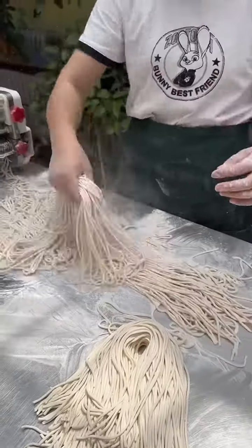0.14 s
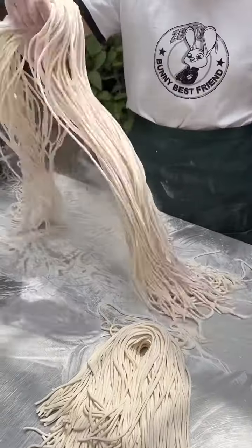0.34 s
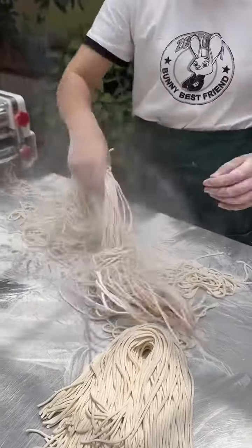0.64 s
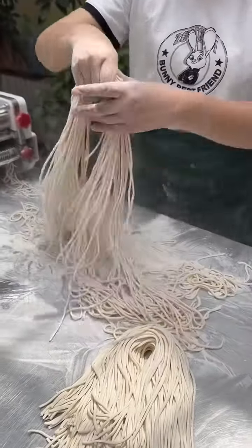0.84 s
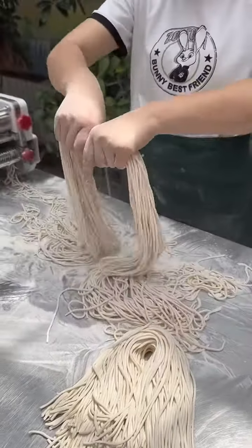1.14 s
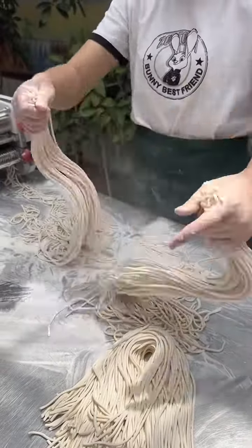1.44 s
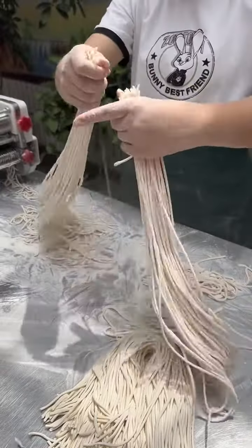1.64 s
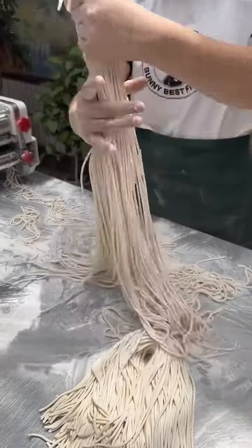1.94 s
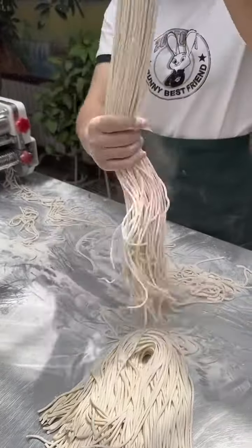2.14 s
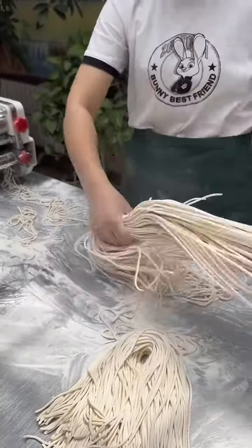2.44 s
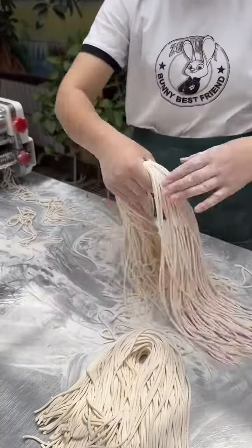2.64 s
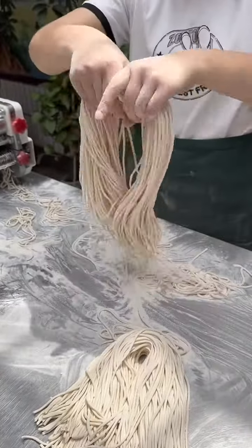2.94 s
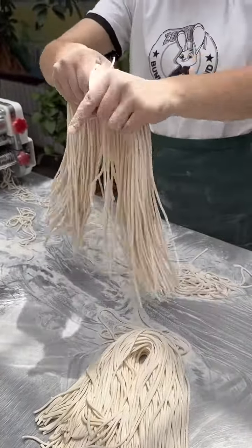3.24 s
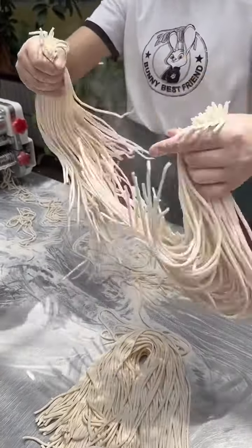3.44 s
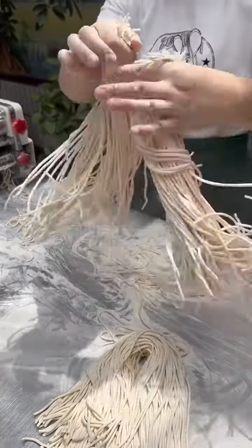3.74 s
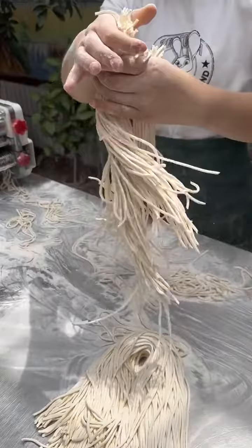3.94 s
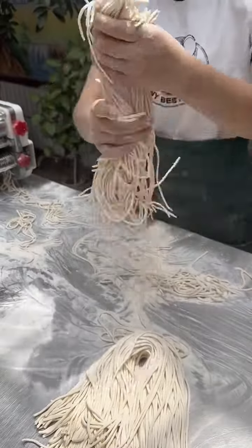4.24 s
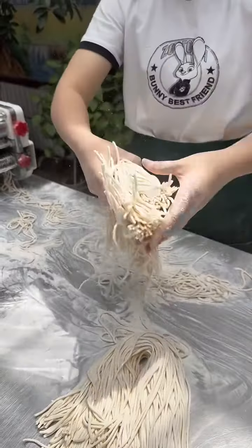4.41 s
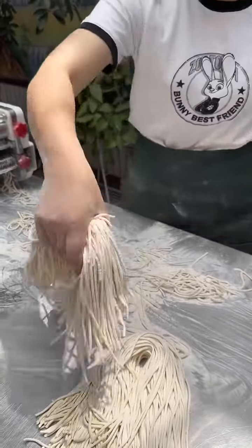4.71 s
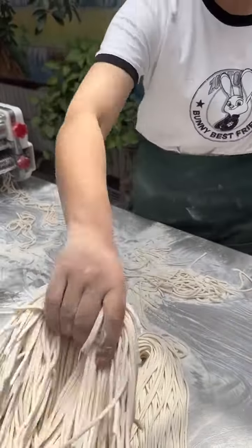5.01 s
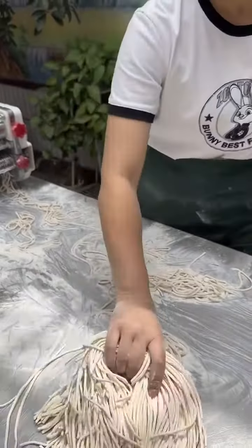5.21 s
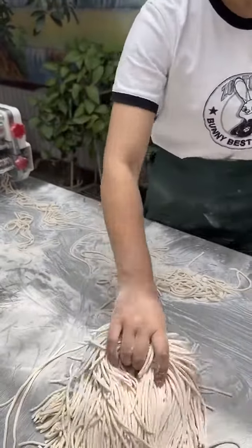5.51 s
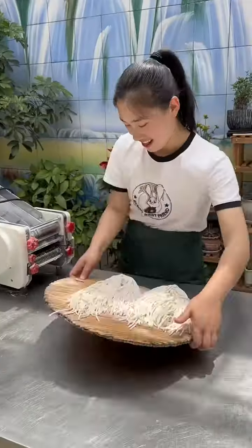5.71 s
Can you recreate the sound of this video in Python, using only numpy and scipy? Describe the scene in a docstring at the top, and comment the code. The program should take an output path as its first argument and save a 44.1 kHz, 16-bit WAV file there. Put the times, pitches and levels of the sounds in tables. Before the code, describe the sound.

In a small, lightly ringing kitchen, noodles land with dense, grainy patter on metal. A double slap starts things, low buffets and a close knock follow, then the brightest slap, fine rustles, and the heaviest deep thump clipping the microphone. After a quiet gap a soft bundle drops nearby and a woven tray scrapes. Sound is centred, practically mono, with little treble.

```python
"""In a kitchen, bundles of fresh floured noodles are swung, slapped and dropped on a steel worktop.
Each landing is a dense patter of tiny random contacts with a hollow note of trapped air.
Strands swish and tick in finer grains; swung and landing bundles push air at the microphone,
heard as dull thumps of damped tones and as low noise. A woven tray scrapes at the end,
over soft room noise and a faint hum."""
import sys
import numpy as np
from scipy import signal
from scipy.fft import rfft, irfft
from scipy.io import wavfile

SR = 44100
rng = np.random.default_rng(int(sys.argv[2]) if len(sys.argv) > 2 else 0)


def materialize(psi):
    """Save the field psi as 16-bit PCM at rate SR to the path in sys.argv[1].

    A 1-D psi becomes a single channel; in a 2-D psi each row is a channel.
    """
    bounded = np.clip(np.atleast_2d(psi).T, -1, 1)
    quanta = np.round(bounded * 32767).astype(np.int16)
    wavfile.write(sys.argv[1], SR, quanta)


N = 258822
TIME = np.arange(N) / SR  # seconds
FREQ = np.maximum(np.fft.rfftfreq(4096, 1 / SR), 1)  # Hz, kept above zero for the logarithms

# Bundles landing on the steel: tips_peak_s, tips_level_db, tips_spread_s, bulk_lag_s, bulk_level_db,
# settling_level_db, settling_decay_s, hardness_0_to_1, hollow_pitch_hz, hollow_boost_db
LANDINGS = [ (0.057, -19.5, 0.0063, 0.0033, -24.5, -26.5, 0.039, 0.41, 1064, 2.5),
            (0.542, -16, 0.0032, .012, -14.5, -24.5, .04, 0.53, 1110, 6),
            (0.6562, -17, 0.0016, 0.011, -27.5, -31, 0.03, 0.49, 835, 2.5),
            (2.452, -30.5, .004, 0.023, -23, -40, .02, 0.02, 980, 23.5),
            (2.4962, -8, 0.0016, .017, -9.5, -24.5, .045, 0.8, 971, -2.5),
            (4.4435, -30, 0.0035, 0.022, -35.5, -38.5, 0.062, 0.09, 985, 5),
            (5.1745, -29, 0.0033, 0.019, -18.5, -39.5, 0.028, 0.33, 895, 16)]
# Colour of a slap: frequency_hz, level_db
SLAP_COLOUR = [(40, -2), (130, -4), (300, -2), (650, -0.5), (1000, 2.5), (1350, -2.5), (1850, -10.5),
               (2800, -7.5), (4000, -16.5), (5500, -19), (7500, -34), (10000, -43), (13000, -68)]
# Less room is heard as the last bundle lands nearer the microphone: time_s, room_send_db
SLAP_ROOM = [(4.4, -2.5), (5.15, -7)]
# Strands sliding through the hands and over the flour; the two long, faint rows at 0.42 and 1.17 s
# are swells of background hiss: peak_s, level_db, rise_s, rustle_centre_hz, hollow_boost_db
SWISHES = [ (0.420, -60, .10, 2790, -4), (1.170, -62, 0.17, 2850, 1), (1.262, -51, 0.0087, 6400, 13),
           (1.650, -55.5, 0.024, 2620, -13), (1.715, -50, 0.031, 2440, -10.5),
           (1.977, -43.5, .036, 2750, 15.5), (2.063, -48.5, .058, 3800, -1), (2.230, -61, .033, 3500, -0.5),
           (2.474, -30, 0.019, 2650, 3), (2.555, -40, .012, 4600, 0), (2.713, -51.5, 0.038, 3060, -1),
           (3.133, -41, .007, 2540, 17), (3.190, -49.5, .028, 3350, 18), (3.279, -37.5, 0.0098, 3500, 5.5),
           (3.505, -65, .018, 4800, -7.5), (3.590, -52.5, 0.017, 2910, -13), (4.504, -47, .036, 2700, 1),
           (5.083, -61, 0.028, 2800, 14.5), (5.226, -43, .014, 2800, 6), (5.285, -50.5, 0.056, 2650, -10)]
# Colour of sliding strands: frequency_hz, level_db
SWISH_COLOUR = [(100, -15), (600, -2), (1200, 1), (1750, -11), (2450, -3.5), (3400, -4.5), (4800, -9),
                (6500, -20.5), (8500, -37), (12000, -67)]
# A faster slide rustles higher and brighter: rustle_centre_hz, brightness_db_per_octave
SLIDE_BRIGHTNESS = [(2500, -10), (3300, 4), (6400, 5.5)]
# Single strands snapping or flicking the steel: peak_s, level_db, pitch_hz
TICKS = [(1.289, -28, 3570), (1.661, -40.5, 2630), (2.2, -44, 3466), (5.299, -30.5, 3700)]
# Dull thumps of air pushed at the microphone by swinging and landing bundles:
# peak_s, level_db, pitch_hz, rise_s, decay_s
THUMPS = [ (0.062, -28.5, 60, 0.0043, 0.0089), (0.55, -17.5, 49.6, 0.011, 0.003),
          (0.798, -12, 93.5, 0.0027, 0.0052), (0.902, -21.5, 59.5, 0.0087, 0.018),
          (1.328, -15.5, 36, 0.018, 0.078), (1.368, -16, 83, .0044, 0.018), (1.834, -18, 78, 0.0019, 0.016),
          (2.22, -26.5, 56.5, 0.0096, 0.0033), (2.351, -24.5, 69, 0.005, 0.0099),
          (2.512, -20, 136, .009, .02), (2.915, -36.5, 85.8, 0.0034, 0.0066),
          (3.331, 2.5, 46.2, 0.009, 0.015)]
# Dry knocks close to the microphone: peak_s, level_db, rise_s, decay_s, brightness_db_per_octave
KNOCKS = [(1.338, -29.5, .003, 0.035, 2.5), (1.365, -16.5, 0.0016, 0.0025, 0.5),
          (1.3735, -7, 0.00082, 0.001, -3), (3.314, -10.5, 0.0014, 0.0043, 2),
          (3.338, -14, 0.003, 0.003, 1.5), (3.35, -19.5, 0.0059, 0.016, -1.5)]
# Colour of a knock: frequency_hz, level_db
KNOCK_COLOUR = [(40, 5), (130, -1), (420, -7), (750, -15), (1300, -20), (2000, -26), (4000, -35.5),
                (7000, -46), (8500, -58), (10500, -80.5)]
# Swings of the bundle pushing air at the microphone: peak_s, level_db, rise_s
SWINGS = [ (0.135, -31, .03), (0.836, -25, 0.047), (1.368, -24, 0.054), (2.02, -36.5, 0.078),
          (2.395, -28.5, .028), (2.78, -42.5, 0.06), (3.173, -35, .018), (3.341, -21, 0.028),
          (4.421, -46, 0.039)]
# Colour of the pushed air: frequency_hz, level_db
AIR_COLOUR = [(10, -1.5), (25, 0), (60, 1.5), (130, -8), (220, -20), (400, -31.5), (1000, -86)]
# Colour of the scraping tray: frequency_hz, level_db
TRAY_COLOUR = [(50, 8), (130, 5.5), (500, 9), (1200, 5.5), (2100, 6.5), (3000, -4.5), (5000, -16.5),
               (7000, -41.5), (10000, -82)]
# Resonances of the tray: pitch_hz, width_hz, boost_db
TRAY_MODES = [(130, 105, 13), (478.4, 12, 17.5), (824, 113, 17), (1194, 190, 14), (2093, 40, 17)]
# Ringing bands of worktop and room (t60 is the time to fall by 60 dB): centre_hz, t60_s, level_db
RING_BANDS = [(207.4, 0.38, -16), (550, 0.52, -7.5), (990, 0.82, -22), (1576, 0.21, -11.5),
              (2660, 0.41, -9), (5000, 0.3, -10.5)]
# Ringing modes of the steel sheet: pitch_hz, t60_s, level_db
SHEET_MODES = [(648, .39, -40), (1224, .45, -37.5), (2190, .35, -35.5), (2353, .4, -33.5),
               (3020, .4, -34.5), (4640, .3, -31.5)]
# Level of the room's background: time_s, level_db
BACKGROUND_LEVEL = [(0, -55), (1.15, -57), (1.5, -59), (1.85, -56), (2.35, -57.5), (2.8, -62), (3.05, -76),
                    (3.35, -62.5), (3.9, -71), (4.95, -67), (5.15, -61), (5.7, -64)]
# Colour of the room noise: frequency_hz, level_db
ROOM_COLOUR = [(40, -13.5), (120, 0), (250, -8.5), (450, -6), (1000, -10.5), (1900, -13.5), (2900, -14.5),
               (3900, -19), (5300, -26), (6500, -35.5), (8000, -59), (10000, -59)]
# Mains hum of an appliance: pitch_hz, level_against_background_db
HUM = [(50, -12), (150, -15.5), (250, -7.5), (300, -12), (450, -12.5), (700, -16.5), (800, -17),
       (1000, -15.5)]

# A landing: the tips touch first, the bulk follows, then loose strands settle
TIPS_FALL_PER_RISE, TIPS_WEIGHT_DB, TIPS_DB_PER_OCTAVE = 1.2, -3, -1.04
BULK_RISE_S, BULK_DECAY_S = 0.0051, 0.008
SETTLE_LAG_S, SETTLE_RISE_S, SETTLE_WEIGHT_DB, SETTLE_DB_PER_OCTAVE = 0.02, 0.008, 6, -1.27
# From the softest landing to the hardest: brightness, top of the treble, weight below about 500 Hz
SOFT_DB_PER_OCTAVE, HARD_DB_PER_OCTAVE = -5.5, 5.5
SOFT_TOP_HZ, HARD_TOP_HZ = 3800, 7730
SOFT_WEIGHT_DB, HARD_WEIGHT_DB = -23, 11
HOLLOW_WIDTH_HZ = 240
# A slower slide also dies away more slowly
SWISH_RELEASE_S, SWISH_FALL_PER_RISE = 0.0079, 1.05
# A heavy thump gains a short overtone, growing with the square of its strength
OVERTONE_RATIO, OVERTONE_DB, OVERTONE_LENGTH = 2.6, -9, 0.57
# The eddies outlast the push, and leave a weak, slow wake
EDDY_FALL_PER_RISE, WAKE_DB, WAKE_DECAY_S, WAKE_TOP_HZ = 1.4, -23.5, 0.079, 25
TOP_HZ = 10000
OFFSET = 0.0015  # constant shift of the waveform


def undb(db):
    """Turn decibels into gain."""
    return 10 ** (np.asarray(db) / 20)


def unit(x):
    """Scale to an rms of 1."""
    return x / np.sqrt(np.mean(x ** 2))


def curve(rows):
    """Join (time, value) rows by straight lines."""
    return np.interp(TIME, *np.transpose(rows))


def shape(points):
    """Join (Hz, dB) points along a logarithmic frequency axis."""
    hz, db = np.transpose(points)
    return np.interp(np.log(FREQ), np.log(hz), db)


def octaves_above(hz, most):
    """Count octaves above a frequency, from zero up to that frequency times most."""
    return np.log2(np.clip(FREQ / hz, 1, most))


def bump(hz, width_hz):
    """Outline a resonance that is 1 at its centre."""
    return 1 / (1 + ((FREQ - hz) / (0.5 * width_hz)) ** 2)


def colour(x, colour_db):
    """Filter with the given gain at each frequency, letting nothing sound before its cause."""
    cepstrum = irfft(colour_db * np.log(10) / 20)
    half = len(cepstrum) // 2
    # Folding the second half onto the first makes the filter minimum phase
    cepstrum[1:half] *= 2
    cepstrum[half + 1:] = 0
    response = irfft(np.exp(rfft(cepstrum)))
    return signal.fftconvolve(x, response)[:len(x)]


def swell(peak_s, rise_s, decay_s):
    """Give the sample range and envelope of a soft rise and an exponential fall."""
    first = max(0, int((peak_s - 4 * rise_s) * SR))
    last = int((peak_s + 9 * decay_s + 0.02) * SR)
    span = slice(first, last)
    t = TIME[span] - peak_s
    return span, np.exp(np.where(t < 0, -0.5 * (t / rise_s) ** 2, -t / decay_s))


def contacts(rate, spread_db):
    """Scatter tiny random contacts of uneven size, rate of them a second."""
    chance, size = rng.random(N), rng.standard_normal(N)
    hit = np.flatnonzero(chance < rate / SR)
    clicks = np.zeros(N)
    # The neighbouring draw sets the sign, so it does not depend on the size
    clicks[hit] = np.sign(size[hit - 1]) * undb(spread_db * size[hit])
    return clicks


def add(out, peak_s, level_db, rise_s, decay_s, clicks, colour_db):
    """Add one coloured flurry of contacts whose rms peaks near level_db."""
    span, envelope = swell(peak_s, rise_s, decay_s)
    flurry = clicks[span] * envelope
    flurry = flurry * np.linalg.norm(envelope) / (np.linalg.norm(flurry) + 1e-18)
    colour_gain = np.sqrt(np.mean(undb(colour_db) ** 2))
    out[span] += undb(level_db) * colour(flurry, colour_db) / colour_gain


def hollow(hz, width_hz, third=0.35):
    """A pocket of air open at one end rings at its note and, more weakly, at three times that."""
    return bump(hz, width_hz) + third * bump(3 * hz, 2 * width_hz)


def slaps():
    """Tips, bulk, then stragglers patter down; harder is brighter and heavier, and trapped air sounds hollow."""
    out = np.zeros(N)
    treble = octaves_above(1000, most=6)
    bass = 1 / (1 + (FREQ / 520) ** 4)
    for (tips_s, tips_db, spread_s, lag_s, bulk_db, settle_db, settle_decay_s,
         hardness, hollow_hz, hollow_db) in LANDINGS:
        db_per_octave = SOFT_DB_PER_OCTAVE + hardness * (HARD_DB_PER_OCTAVE - SOFT_DB_PER_OCTAVE)
        top_hz = SOFT_TOP_HZ + hardness * (HARD_TOP_HZ - SOFT_TOP_HZ)
        weight_db = SOFT_WEIGHT_DB + hardness * (HARD_WEIGHT_DB - SOFT_WEIGHT_DB)
        tone = shape(SLAP_COLOUR) + db_per_octave * treble + weight_db * bass
        tone = tone - 10 * np.log10(1 + (FREQ / top_hz) ** 12)  # steep fall above the top
        tone = tone + hollow_db * hollow(hollow_hz, HOLLOW_WIDTH_HZ)
        tips_tone = tone + TIPS_WEIGHT_DB * bass + TIPS_DB_PER_OCTAVE * treble
        settle_tone = tone + SETTLE_WEIGHT_DB * bass + SETTLE_DB_PER_OCTAVE * treble
        bulk_s = tips_s + lag_s
        add(out, tips_s, tips_db, spread_s, TIPS_FALL_PER_RISE * spread_s,
            contacts(rate=15000, spread_db=3.0), tips_tone)
        add(out, bulk_s, bulk_db, BULK_RISE_S, BULK_DECAY_S,
            contacts(rate=13000, spread_db=-1.5), tone)
        add(out, bulk_s + SETTLE_LAG_S, settle_db, SETTLE_RISE_S, settle_decay_s,
            contacts(rate=11000, spread_db=1.9), settle_tone)
    return out


def thumps():
    """Swinging and landing bundles push air at the microphone in dull, damped thumps, heavy ones with an overtone."""
    out = np.zeros(N)
    for peak_s, level_db, hz, rise_s, decay_s in THUMPS:
        # Doubling the decibels squares the strength
        overtone = (OVERTONE_RATIO, 2 * level_db + OVERTONE_DB, OVERTONE_LENGTH)
        for ratio, part_db, length in [(1, level_db, 1), overtone]:
            span, envelope = swell(peak_s, length * rise_s, length * decay_s)
            wave = np.sin(2 * np.pi * ratio * hz * (TIME[span] - peak_s))
            out[span] -= undb(part_db) * envelope * wave
    return out


def knocks():
    """The swinging bundle bumps right beside the microphone: deep, with a little crackle and no room."""
    out = np.zeros(N)
    treble = octaves_above(500, most=16)
    for peak_s, level_db, rise_s, decay_s, db_per_octave in KNOCKS:
        tone = shape(KNOCK_COLOUR) + db_per_octave * treble
        add(out, peak_s, level_db, rise_s, decay_s, contacts(rate=12000, spread_db=1.5), tone)
    return out


def swishes(rustle_db=10, rustle_width=0.61, upper_share=0.35):
    """Strands slip past each other in a fine grain, faster being higher and brighter; two faint swells are hiss."""
    out = np.zeros(N)
    note = bump(950, HOLLOW_WIDTH_HZ) + upper_share * bump(2520, HOLLOW_WIDTH_HZ)
    treble = octaves_above(2000, most=4)
    for peak_s, level_db, rise_s, centre_hz, hollow_db in SWISHES:
        db_per_octave = np.interp(centre_hz, FREQ, shape(SLIDE_BRIGHTNESS))
        rustle = rustle_db * bump(centre_hz, rustle_width * centre_hz)
        tone = shape(SWISH_COLOUR) + rustle + db_per_octave * treble + hollow_db * note
        decay_s = SWISH_RELEASE_S + SWISH_FALL_PER_RISE * rise_s
        add(out, peak_s, level_db, rise_s, decay_s, contacts(rate=4300, spread_db=-0.5), tone)
    return out


def ticks(body_db=-5):
    """A lone strand gives one short, bright tick."""
    out = np.zeros(N)
    grain = contacts(rate=15000, spread_db=2)
    for peak_s, level_db, hz in TICKS:
        tone = shape(SWISH_COLOUR) + 13 * bump(hz, width_hz=3100) + body_db * bump(700, width_hz=1600)
        add(out, peak_s, level_db, 0.0009, 0.0016, grain, tone)
    return out


def air():
    """Each swing sends eddies that flutter on the microphone, then a weak wake of slower, deeper ones."""
    eddy_level, wake_level = np.zeros(N), np.zeros(N)
    for peak_s, level_db, rise_s in SWINGS:
        span, envelope = swell(peak_s, rise_s, EDDY_FALL_PER_RISE * rise_s)
        eddy_level[span] += undb(level_db) * envelope
        span, envelope = swell(peak_s, rise_s, WAKE_DECAY_S)
        wake_level[span] += undb(level_db + WAKE_DB) * envelope
    eddy_colour = shape(AIR_COLOUR)
    wake_colour = eddy_colour - 10 * np.log10(1 + (FREQ / WAKE_TOP_HZ) ** 2)
    eddies = unit(colour(rng.standard_normal(N), eddy_colour))
    wake = unit(colour(rng.standard_normal(N), wake_colour))
    return eddies * eddy_level + wake * wake_level


def tray():
    """The woven tray touches down, then scrapes on the steel in a longer flurry, ringing its frame."""
    out = np.zeros(N)
    modes = sum(boost_db * bump(hz, width_hz) for hz, width_hz, boost_db in TRAY_MODES)
    tone = shape(TRAY_COLOUR) + modes
    weave = contacts(rate=2200, spread_db=0.5)
    add(out, 5.765, -41, 0.002, 0.02, weave, tone)  # touch
    add(out, 5.792, -31, 0.013, 0.16, weave, tone)  # scrape
    return out


def ring(x, build_s=0.0041):
    """Worktop and room ring densely, each band dying at its own rate, with the steel sheet's modes added."""
    t = TIME[:SR]  # one second of ringing
    response = np.zeros(SR)
    centres = np.log([row[0] for row in RING_BANDS])
    spectrum = rfft(rng.standard_normal(SR))
    log_hz = np.log(np.arange(SR // 2 + 1) + 1)
    # Each row of the identity matrix picks one band, fading into its neighbours
    for (hz, t60_s, level_db), share in zip(RING_BANDS, np.eye(len(RING_BANDS))):
        envelope = np.exp(-np.log(1000) * t / t60_s) * (1 - np.exp(-t / build_s))
        band = irfft(spectrum * np.interp(log_hz, centres, share))
        response += undb(level_db) * band * envelope / np.linalg.norm(envelope)
    for hz, t60_s, level_db in SHEET_MODES:
        mode = np.exp(-np.log(1000) * t / t60_s) * np.sin(2 * np.pi * hz * t)
        response += undb(level_db) * mode / np.linalg.norm(mode)
    return signal.fftconvolve(x, response)[:N]


def background(hiss_db=-1):
    """Soft kitchen noise and the steady tones of a mains hum sink and return together."""
    hiss = unit(colour(rng.standard_normal(N), shape(ROOM_COLOUR)))
    hum = np.zeros(N)
    for hz, level_db in HUM:
        tone = np.sin(2 * np.pi * (hz * TIME + rng.random()))
        hum += undb(level_db) * np.sqrt(2) * tone  # the root of two gives the sine an rms of 1
    return (undb(hiss_db) * hiss + hum) * undb(curve(BACKGROUND_LEVEL))


def scene(swish_room_db=-6, tick_room_db=-7, tray_room_db=-4):
    """Everything happens straight ahead, the same in both channels."""
    landings, rustle, snaps, scrape = slaps(), swishes(), ticks(), tray()
    room_send = undb(curve(SLAP_ROOM)) * landings + undb(swish_room_db) * rustle
    room_send += undb(tick_room_db) * snaps + undb(tray_room_db) * scrape
    mono = landings + rustle + snaps + scrape + ring(room_send)
    mono += knocks() + thumps() + air() + background()
    return np.array([mono, mono])


def record(dry):
    """Two nearly equal channels get a slight offset; peaks beyond full scale flatten; the top is cut."""
    gains = undb(np.array([[0.12], [0]]))  # first and second channel
    limited = np.clip(gains * dry + OFFSET, -1, 1)
    lowpass = signal.ellip(8, 0.2, 70, TOP_HZ, fs=SR, output="sos")
    return signal.sosfilt(lowpass, limited)


dry = scene()
out = record(dry)
materialize(out)
```